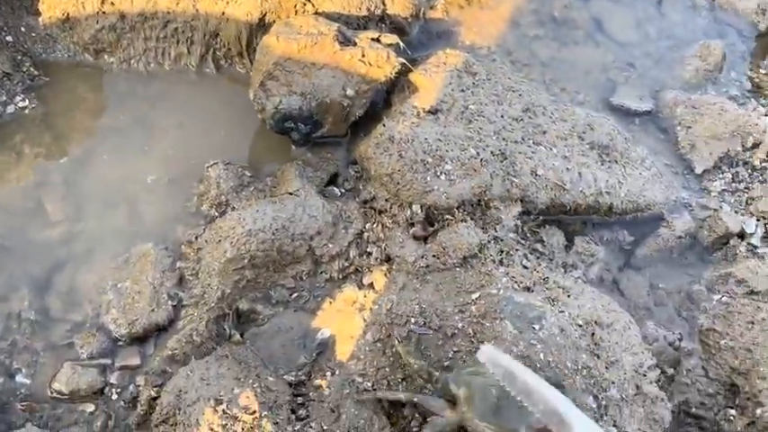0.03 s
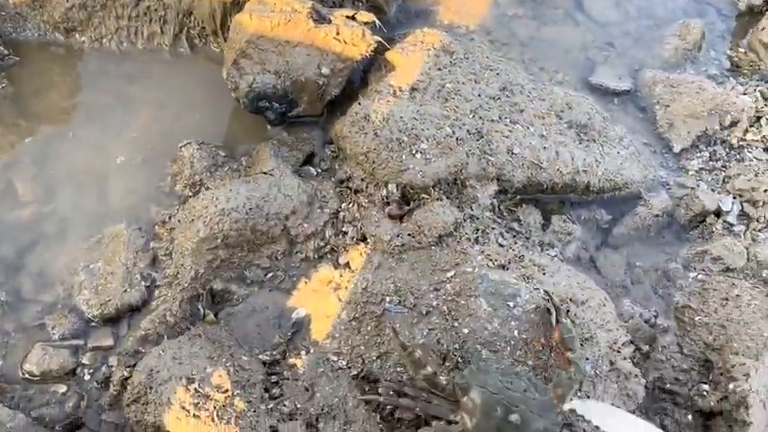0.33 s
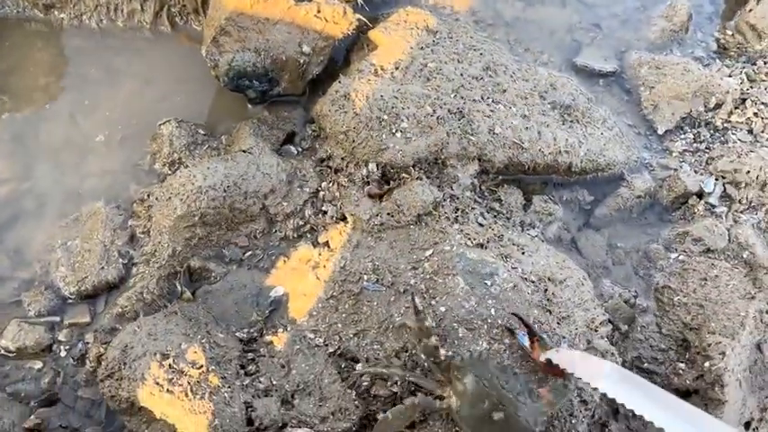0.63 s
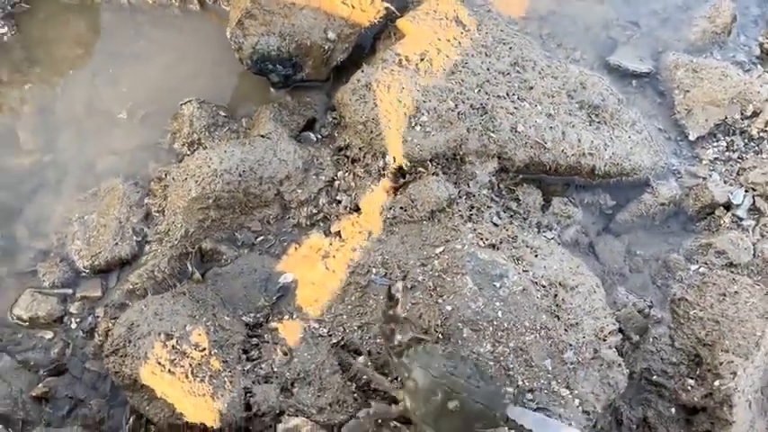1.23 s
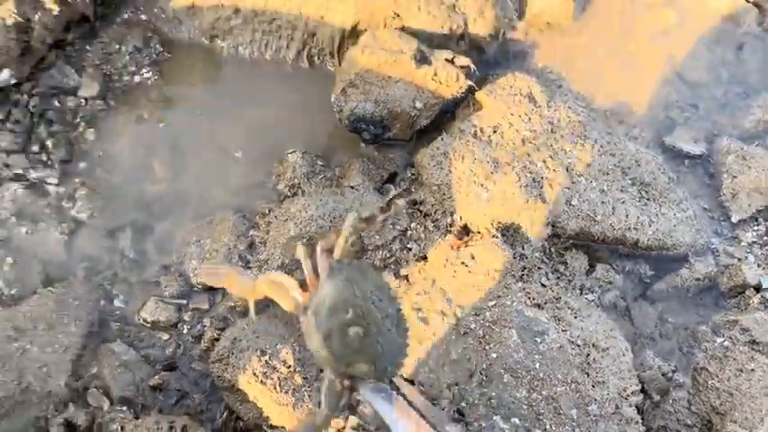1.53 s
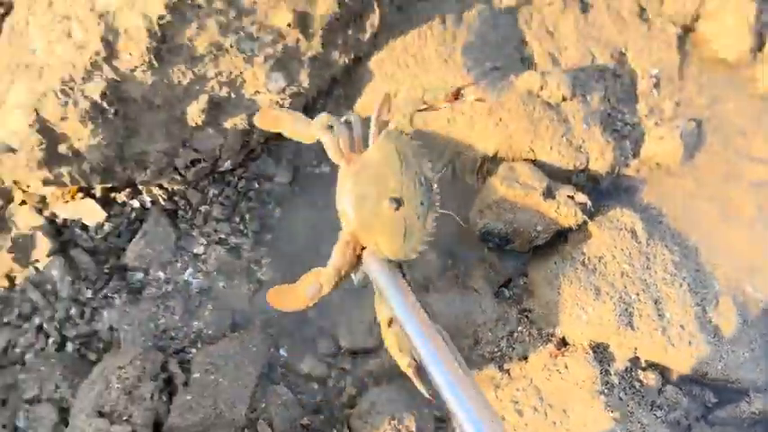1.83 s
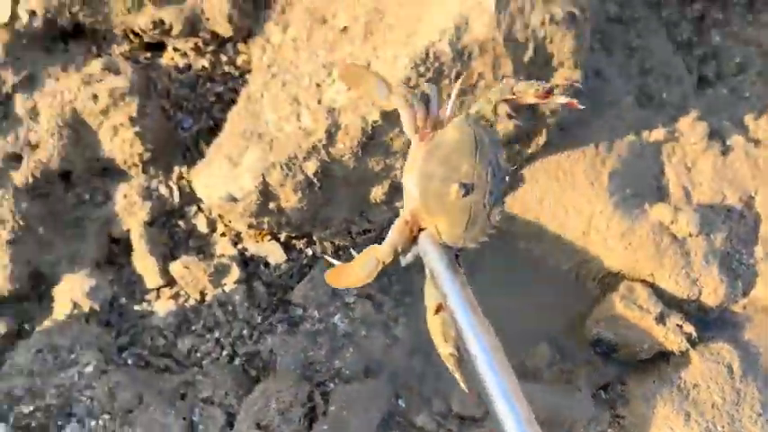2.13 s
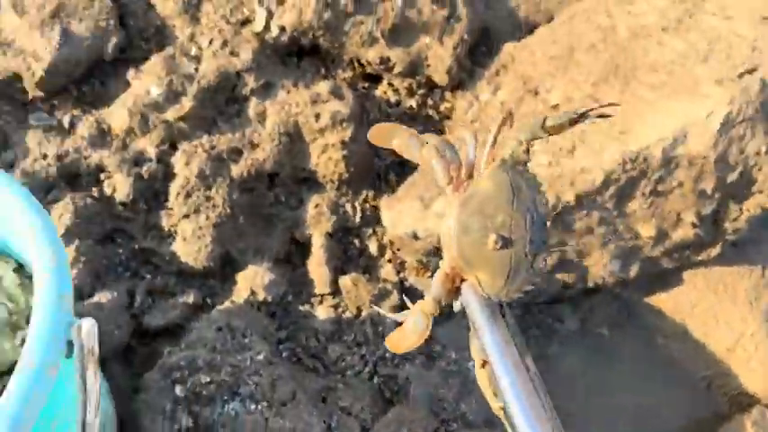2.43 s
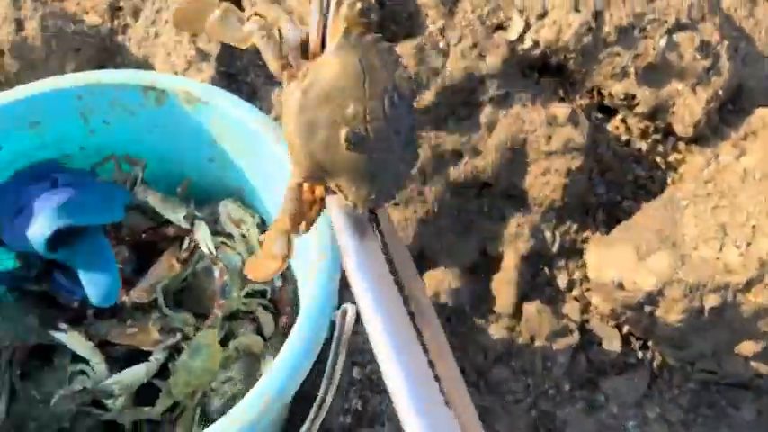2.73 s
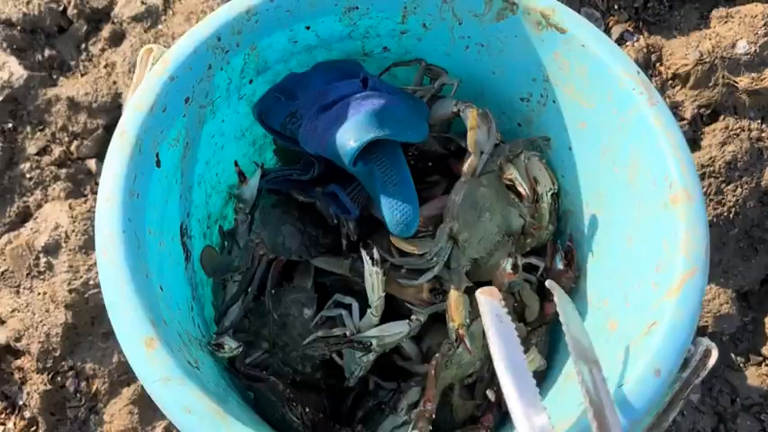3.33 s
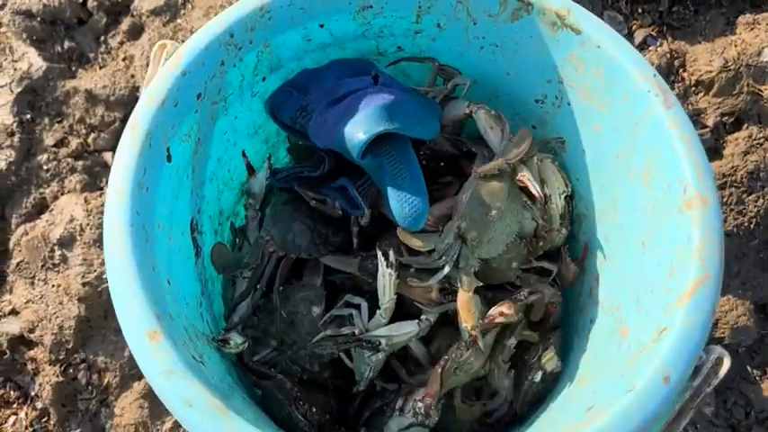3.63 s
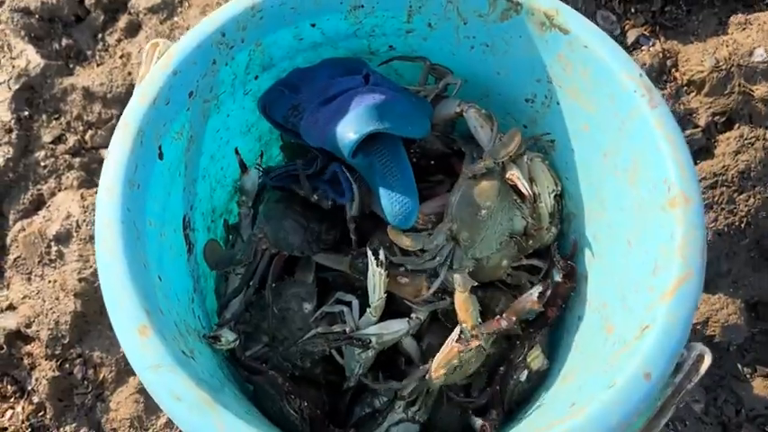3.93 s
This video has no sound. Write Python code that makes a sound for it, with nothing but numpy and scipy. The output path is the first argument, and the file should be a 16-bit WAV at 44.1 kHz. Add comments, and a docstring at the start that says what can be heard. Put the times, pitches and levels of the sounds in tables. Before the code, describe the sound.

Wind buffets the microphone as a crab is dropped into a plastic bucket with two knocks.

```python
"""Shell scrapes and ticks on wet shore rocks, close to the microphone, in a light wind.
Metal tongs pick up a crab and drop it into a plastic bucket of other crabs: the wall rings with
two knocks, the crabs jostle, legs scrabble, and the blades snap shut at the end.
Wind buffets the microphone, hard once it swings towards the bucket, with a few dull hollow pops."""
import sys
import numpy as np
from scipy import signal
from scipy.fft import rfft, irfft
from scipy.io import wavfile
from scipy.ndimage import uniform_filter1d

SR = 44100
rng = np.random.default_rng(int(sys.argv[2]) if len(sys.argv) > 2 else 0)


def dump_mix(stems):
    """Bounce the given channels to the path in sys.argv[1] as a 16-bit WAV at rate SR."""
    frames = np.atleast_2d(stems).T  # one column per channel
    limited = np.clip(frames, -1, 1)  # hard clip at full scale
    pcm = np.round(limited * 32767).astype(np.int16)
    wavfile.write(sys.argv[1], SR, pcm)


N = 176400

# Blade contacts. Each row: start in seconds, main ring in Hz, level in dB, brightness in dB per octave.
BLADE_CONTACTS = [(.3305, 3600, -36, -4), (1.018, 5830, -29.5, 0), (3.2922, 5200, -24.5, 0),
                  (3.2974, 5370, -19, 6), (3.937, 5000, -20.5, -5), (3.9448, 5000, -18, -9),
                  (3.9505, 5000, -15, -6), (3.9525, 5200, -9, 5.5), (3.9554, 5194, -1, -6),
                  (3.9585, 5240, -10, -7), (3.967, 5390, -22, 1)]
# Knocks on the bucket. Each row: start in seconds, wall level in dB, wall pitch ratio,
# crack level in dB, thud pitch in Hz, thud level in dB.
BUCKET_KNOCKS = [(2.9352, -11, 1.0, -14, 315, -11.5), (3.2923, -14, .84, -9.5, 280.6, -5)]
# Modes of tongs and bucket wall. Each row: base pitch in Hz, relative level in dB, free t60 in seconds.
BLADE_MODES = [(4150, -16, 0.022), (4840, -9, 0.017), (5080, -10, 0.023), (5217, 1, 0.041),
               (5700, -16, 0.027), (7380, -9, .03), (8390, -7.5, .028), (8600, -10, .028),
               (9240, -15, .035), (10000, -17, 0.04)]
WALL_MODES = [(490, -4, 0.045), (614, -6.5, 0.044), (900, -9, 0.025), (1053, 2.5, 0.038), (1362, 1, 0.036),
              (1635, -5, 0.036), (2100, -6, 0.032), (2474, -6, 0.027), (2830, -7, 0.028),
              (3320, -12, 0.044)]
# Dull hollow pops in the wind, then crabs bumping in the bucket.
# Each row: start in seconds, low ring in Hz, high ring in Hz, level in dB.
POPS_AND_BUMPS = [(1.658, 421, 1526, -23), (1.789, 486, 890, -21), (1.85, 410, 845, -21.5),
                  (2.292, 370, 735, -17), (2.421, 523, 784, -19), (2.878, 900, 1110, -25),
                  (3.082, 293, 1040, -14), (3.11, 404, 1195, -12), (3.138, 430, 905, -16),
                  (3.162, 517, 1180, -10.5), (3.373, 386, 1250, -14), (3.394, 520, 1080, -18),
                  (3.441, 316, 900, -16), (3.511, 444, 1113, -12.5), (3.552, 458, 1205, -19.5),
                  (3.688, 560, 1170, -20.5)]
# Shell and claw ticks. Each row: start in seconds, then body, snap and edge levels in dB.
SHELL_TICKS = [(.2798, -35.5, -46, -47), (.33, -53, -39.5, -48), (1.017, -45.5, -39, -30),
               (1.085, -53, -36, -43), (1.2297, -37, -54, -64), (1.877, -32, -55, -64),
               (2.1067, -30, -38.5, -62), (2.8073, -56, -35.5, -36), (2.829, -46, -29.5, -34),
               (2.8577, -39, -48, -33.5), (2.9913, -42, -35.5, -31), (2.9992, -42, -40, -33),
               (3.0052, -30, -36.5, -24), (3.018, -29, -37, -37), (3.075, -36, -43, -54),
               (3.1738, -33, -36, -35.5), (3.45, -31.5, -41.5, -48.5), (3.5883, -51, -36.5, -39),
               (3.6074, -45, -32.5, -35.5), (3.784, -31, -40.5, -40.5), (3.8088, -37, -38.5, -48)]
# A tick's body, snap and edge resonances. Each row: low and high limit in Hz.
SHELL_BANDS = [(1000, 2090), (3300, 5200), (7400, 13600)]
# Swells of crabs shifting on plastic, shell dragging, legs scrabbling and shore hiss.
# Each row: peak time, rise and fall in seconds, level in dB.
CRAB_SHIFTS = [(2.89, 0.022, 0.021, -33), (3.39, 0.026, 0.034, -41.5), (3.52, .06, 0.045, -41.5)]
SHELL_SCRAPES = [(.09, 0.056, 0.14, -50.5), (.23, 0.049, .07, -53), (.337, 0.006, 0.0084, -46),
                 (.49, 0.014, 0.032, -53), (.96, 0.059, 0.038, -56.5), (1.092, .012, 0.021, -49),
                 (1.95, 0.13, 0.11, -55.5), (2.826, 0.011, 0.0071, -42.5), (3.56, .01, 0.014, -50),
                 (3.81, 0.021, 0.018, -51.5), (3.93, 0.023, 0.037, -47)]
LEG_SCRABBLES = [(.2, 0.07, 0.11, -56.5), (.46, 0.042, 0.048, -52.5), (.77, 0.19, 0.16, -62.5),
                 (1.07, 0.07, 0.065, -52.5), (3.008, 0.013, 0.029, -39), (3.085, 0.034, 0.053, -53.5),
                 (3.615, 0.02, 0.044, -45.5)]
HISS_SWELLS = [(1.37, 0.18, 0.16, -49.5), (1.68, 0.05, 0.063, -50.5)]
# Wind at the microphone. Each row: time in seconds, rumble level in dB, flutter level in dB.
WIND_LEVELS = [(0, -47, -50), (.3, -54.5, -51), (.45, -51.5, -61.5), (.56, -47, -66.5), (.8, -43, -60.5),
               (1.0, -45.5, -64.5), (1.15, -54.5, -55.5), (1.44, -40.5, -52.5), (1.53, -27, -35),
               (1.86, -27.5, -34), (1.98, -33.5, -39.5), (2.08, -29, -35), (2.72, -26.5, -34.5),
               (2.82, -29, -36), (2.9, -25.5, -33), (3.12, -24, -29), (3.23, -29, -34), (3.4, -25.5, -29.5),
               (3.55, -23.5, -29.5), (3.8, -24.5, -35), (3.9, -25.5, -43), (4.0, -25, -30)]
# Single buffets. Each row: peak time and half length in seconds, rumble and flutter boosts in dB.
WIND_BUFFETS = [(0.67, 0.0092, 8.5, 3), (.795, 0.016, 12.5, 7), (1.311, 0.017, 11.5, -5),
                (1.354, 0.011, 9, 1), (1.554, 0.0085, 4.5, 11.5), (1.664, 0.012, 6, 7),
                (1.696, 0.02, 6.5, -4), (1.904, .015, 13.5, 7.5), (2.133, 0.014, 7, 2.5),
                (2.223, 0.0057, 8, 3.5), (2.686, 0.011, 2.5, 7.5), (3.166, 0.014, 11.5, 9),
                (3.536, 0.034, 5, 1.5)]
# Spectra of the noisy sounds. Each row: frequency in Hz, relative spectral density in dB.
RASP_SPECTRUM = [(3200, -23.5), (5200, 6), (6600, -16), (8200, -5), (10400, -10), (12000, -27)]
CRACK_SPECTRUM = [(300, -11), (1100, 5), (2400, -8.5), (3300, -6), (4000, -12.5), (5000, -6), (6400, -18.5),
                  (8200, -11), (12000, -25), (15500, -25)]
GRIT_SPECTRUM = [(250, 0.5), (800, -11), (1300, -1), (1900, -4.5), (2600, -10.5), (3600, -7.5),
                 (5000, -2.5), (6500, -17), (8200, -6.5), (11000, -20), (15500, -20)]
LEG_SPECTRUM = [(800, -18), (2500, -13.5), (4800, -1), (6500, -11), (9300, 1.5), (11000, -2), (12800, -3.5),
                (15000, -3)]
RUMBLE_SPECTRUM = [(15, -48), (28, -23), (48, -2), (70, 1), (130, -5), (250, -7.5), (400, -16),
                   (600, -32.5), (1200, -64)]
FLUTTER_SPECTRUM = [(90, -20), (220, -6), (370, 1), (520, -4.5), (750, -15.5), (1150, -25), (1700, -34.5),
                    (2600, -48.5), (5000, -54), (9000, -78)]
SPUTTER_SPECTRUM = [(250, -10), (600, 0.5), (1050, 1.5), (1600, -9.5), (2100, -16.5), (2800, -24),
                    (4600, -28.5), (7000, -47)]
SHORE_SPECTRUM = [(100, 3), (500, 0), (800, -13), (1400, -2.5), (2600, -13), (4800, -7.5), (6500, -16),
                  (9500, -12.5), (12500, -33), (15500, -25)]
HISS_SPECTRUM = [(700, -18), (1400, -3), (2600, -13.5), (4000, -7.5), (5000, 1), (6500, -17.5),
                 (8500, -20.5), (12000, -24), (15500, -23)]
# Response of the microphone port. Each row: frequency in Hz, gain in dB.
MIC_RESPONSE = [(1000, 1), (10000, -1), (11800, -5.5), (12600, -13), (13800, -5), (15500, -5)]

HIT_S, TICK_ATTACK_S, WALL_ATTACK_S, BLADE_ATTACK_S = .15, 0.0011, 0.0014, 0.00061
FREE_RING_DB, RASP_DB = -12.5, -11.5


def tongs():
    """Blades chatter and rasp as they meet; each contact shifts their pitch, the grip damps the ring."""
    out = np.zeros(N)
    grip = fade(0.0092, BLADE_ATTACK_S) + undb(FREE_RING_DB)
    rasp_fade = fade(0.037, BLADE_ATTACK_S)
    main_hz = BLADE_MODES[3][0]
    for at, ring_hz, db, tilt in BLADE_CONTACTS:
        modes = [(hz * ring_hz / main_hz, level + tilt * np.log2(hz / main_hz), t60)
                 for hz, level, t60 in BLADE_MODES]
        rasp = undb(RASP_DB + tilt / 2) * colour(rng.standard_normal(len(grip)), RASP_SPECTRUM)
        clink = ring(modes, BLADE_ATTACK_S, scatter=0.27)
        add(out, at, undb(db) * (clink * grip + rasp * rasp_fade))
    return out


def bucket():
    """A knock cracks, rings the plastic at a pitch set by the spot struck, and thuds in the loaded base."""
    out = np.zeros(N)
    crack_fade = fade(0.018, WALL_ATTACK_S) + undb(-11) * fade(0.096, WALL_ATTACK_S)
    for at, wall_db, ratio, crack_db, thud_hz, thud_db in BUCKET_KNOCKS:
        wall = [(hz * ratio, db, t60) for hz, db, t60 in WALL_MODES]
        add(out, at, undb(wall_db) * ring(wall, WALL_ATTACK_S, scatter=0.93))
        add(out, at, ring([(thud_hz, thud_db, 0.066)], attack=0.0047))
        crack = colour(rng.standard_normal(len(crack_fade)), CRACK_SPECTRUM)
        add(out, at, undb(crack_db) * crack * crack_fade)
    return out


def pops_and_jostling():
    """Dull hollow pops in the wind, then crabs bumping in the bucket as legs patter on the plastic."""
    out = patter(hz=1080, octaves=.4, t60=.06, count=400) * swells(CRAB_SHIFTS)
    for at, low_hz, high_hz, db in POPS_AND_BUMPS:
        modes = [(low_hz, db, 0.049), (high_hz, db - 12.5, 0.039)]
        add(out, at, ring(modes, attack=0.0033))
    return out


def ticks():
    """Hard shell clicks in three broad resonances, each with a faint tail."""
    out = np.zeros(N)
    shape = fade(0.022, TICK_ATTACK_S) + undb(-15.5) * fade(0.14, TICK_ATTACK_S)
    for band, edges in enumerate(SHELL_BANDS):
        bandpass = signal.butter(3, edges, "band", fs=SR, output="sos")
        bursts = unit(signal.sosfilt(bandpass, rng.standard_normal((len(SHELL_TICKS), len(shape)))))
        for (at, *band_db), burst in zip(SHELL_TICKS, bursts):
            add(out, at, undb(band_db[band] - 0.5) * burst * shape)
    return out


def scraping():
    """Shell slips over the rock, with grit crunching under it."""
    grit = colour(grains(rate=1500, spread_db=1.5), GRIT_SPECTRUM) * undb(2.24 * walk(90))
    crunch = undb(-4.5) * patter(hz=1396, octaves=0.534, t60=0.011, count=700)
    return (grit + crunch) * swells(SHELL_SCRAPES)


def scrabbling():
    """Wet legs crackle in uneven flurries of tiny impacts."""
    crackle = colour(grains(rate=2200, spread_db=3), LEG_SPECTRUM)
    flurries = undb(3.5 * walk(120) + 2.5 * walk(35))
    return crackle * flurries * swells(LEG_SCRABBLES)


def wind():
    """Pressure rumble, fluttering eddies and their sputter on the microphone, all lifted by buffets."""
    times, rumble_db, flutter_db = np.array(WIND_LEVELS).T
    rumble_boost = bumps([(at, half, half, db) for at, half, db, _ in WIND_BUFFETS])
    flutter_boost = bumps([(at, half, half, db) for at, half, _, db in WIND_BUFFETS])
    rumble_gain = undb(np.interp(clock(), times, rumble_db) + rumble_boost)
    flutter_gain = undb(np.interp(clock(), times, flutter_db) + flutter_boost)
    rumble = colour(rng.standard_normal(N), RUMBLE_SPECTRUM)
    steady_rumble = rumble / np.sqrt(uniform_filter1d(rumble ** 2, size=1500))
    rumble = unit(steady_rumble * undb(2.5 * walk(50)))
    eddies = np.minimum(walk(110), 2)
    flutter = colour(rng.standard_normal(N) * undb(4.5 * eddies), FLUTTER_SPECTRUM)
    spurts = rng.standard_normal(N) * undb(5 * np.minimum(.5 * eddies + walk(70), 2))
    sputter = undb(-13) * colour(spurts, SPUTTER_SPECTRUM)
    return rumble * rumble_gain + (flutter + sputter) * flutter_gain


def shore():
    """The wet shore lies faint in the background, with soft swells of hiss."""
    bed = colour(rng.standard_normal(N), SHORE_SPECTRUM) * undb(-61.5 + 0.91 * walk(9.3))
    return bed + colour(rng.standard_normal(N), HISS_SPECTRUM) * swells(HISS_SWELLS)


def ring(modes, attack, scatter=0):
    """Decaying sines of a struck body; scatter, in cycles, puts them out of step."""
    phases = scatter * rng.random(len(modes))
    return sum(undb(db) * np.sin(2 * np.pi * (hz * hit_clock() + phase)) * fade(t60, attack)
               for (hz, db, t60), phase in zip(modes, phases))


def patter(hz, octaves, t60, count):
    """Small taps at random times, pitched up to `octaves` either side of hz, at rms 1."""
    out = np.zeros(N)
    for slot, (late, pitch, size) in enumerate(rng.random((count, 3))):
        tap_hz = hz * 2 ** (octaves * (2 * pitch - 1))
        add(out, (slot + late) / count * N / SR, size * ring([(tap_hz, 0, t60)], TICK_ATTACK_S))
    return unit(out)


def grains(rate, spread_db):
    """Random tiny impacts of uneven size, about `rate` a second."""
    impacts = (rng.random(N) < rate / SR) * rng.choice([-1, 1], N)
    return impacts * undb(spread_db * np.minimum(rng.exponential(size=N), 4))


def fade(t60, attack):
    """A quick rise and a decay of 60 dB in t60 seconds."""
    age = hit_clock()
    return np.minimum(age / attack, 1) * np.exp(-np.log(1000) * age / t60)


def swells(rows):
    """Gain of rounded swells whose peaks are given in dB."""
    return bumps([(at, rise, fall, undb(db)) for at, rise, fall, db in rows])


def bumps(rows):
    """Sum of bell curves, each with its own rise and fall."""
    t = clock()
    coarse = t[::32]
    bells = (height * np.exp(-np.minimum(((coarse - at) / np.where(coarse < at, rise, fall)) ** 2, 20))
             for at, rise, fall, height in rows)
    return np.interp(t, coarse, sum(bells))


def walk(rate):
    """Random wavering through `rate` values a second, at rms 1."""
    knots = rng.standard_normal(4096)
    return unit(np.interp(clock() * rate, np.arange(len(knots)), knots))


def colour(x, points):
    """Give a sound a spectrum, at rms 1."""
    return unit(equalise(x, points))


def equalise(x, points):
    """Filter by a curve of (Hz, dB) points."""
    hz, db = np.array(points).T
    bin_hz = np.maximum(np.fft.rfftfreq(x.shape[-1], 1 / SR), 1)
    gain = undb(np.interp(np.log(bin_hz), np.log(hz), db))
    return irfft(rfft(x) * gain, x.shape[-1])


def add(out, start, sound):
    """Mix a short sound in at `start` seconds."""
    first = int(np.clip(start * SR, 0, N - 1))
    out[first:first + len(sound)] += sound[:N - first]


def undb(db):
    """Amplitude of a level in dB."""
    return 10 ** (np.asarray(db) / 20)


def unit(x):
    """Scale to rms 1."""
    return x / np.sqrt(np.mean(x ** 2))


def clock():
    """Seconds since the scene began."""
    return np.arange(N) / SR


def hit_clock():
    """Seconds since a blow."""
    return np.arange(int(HIT_S * SR)) / SR


def scene():
    """Shore, crabs, bucket and tongs at one microphone in the wind."""
    mix = wind() + shore() + scraping() + scrabbling() + ticks() + pops_and_jostling()
    return (mix + bucket() + tongs())[None]


def record(dry):
    """The microphone port dulls the top octave; the recorder rounds the peaks and cuts the top."""
    lowpass = signal.ellip(8, .2, 70, 15900, fs=SR, output="sos")
    return signal.sosfilt(lowpass, np.tanh(equalise(dry, MIC_RESPONSE)))


dry = scene()
out = record(dry)
dump_mix(out)
```